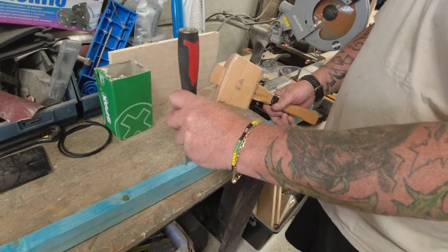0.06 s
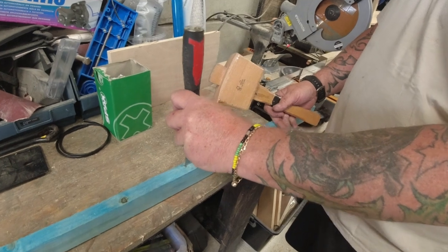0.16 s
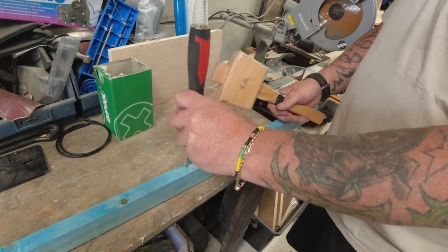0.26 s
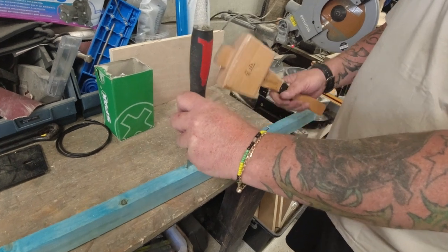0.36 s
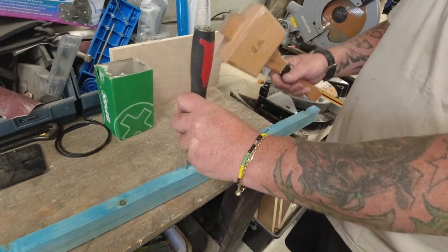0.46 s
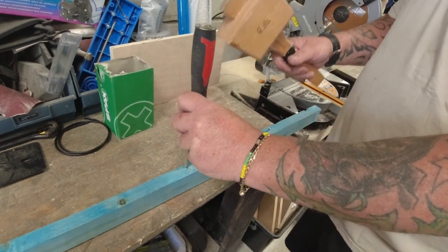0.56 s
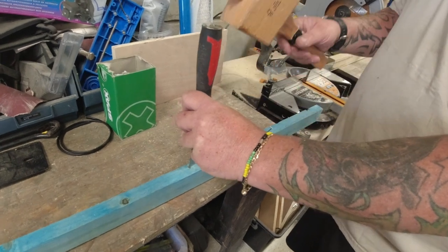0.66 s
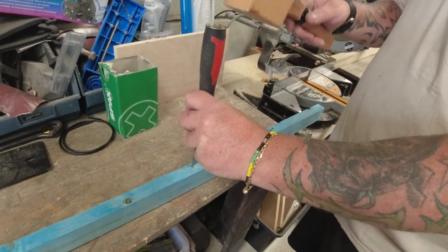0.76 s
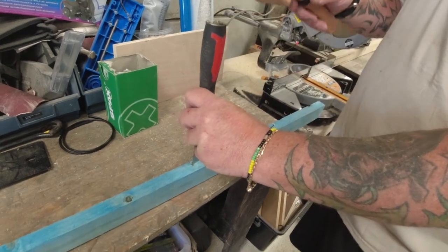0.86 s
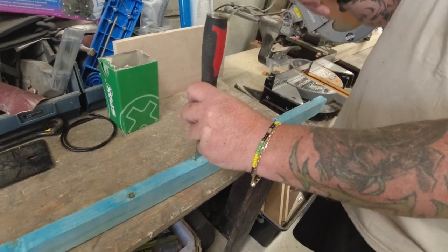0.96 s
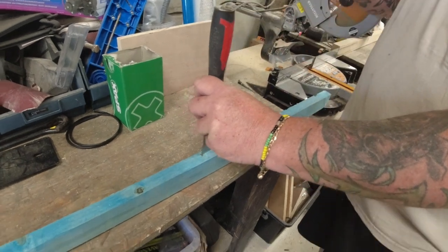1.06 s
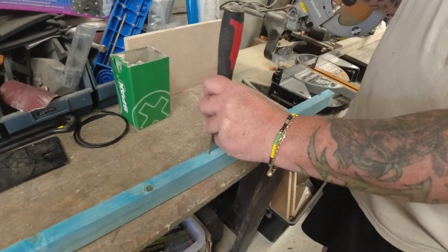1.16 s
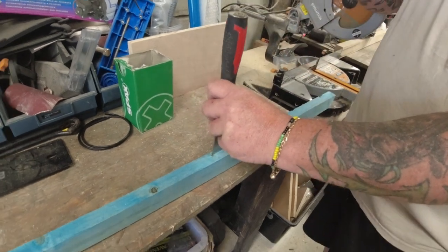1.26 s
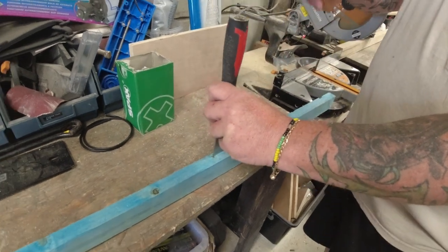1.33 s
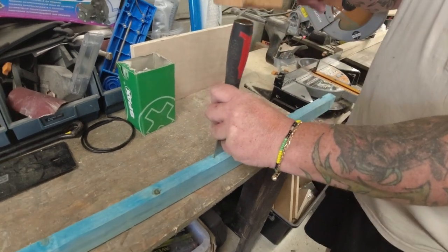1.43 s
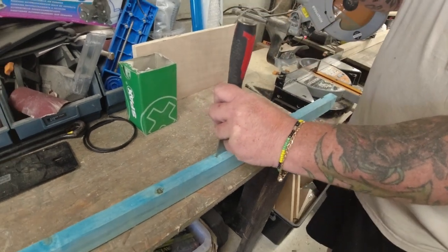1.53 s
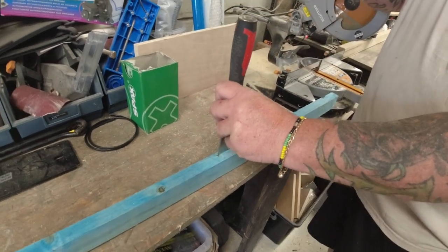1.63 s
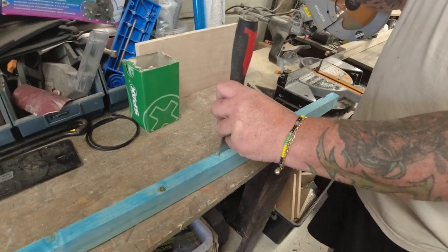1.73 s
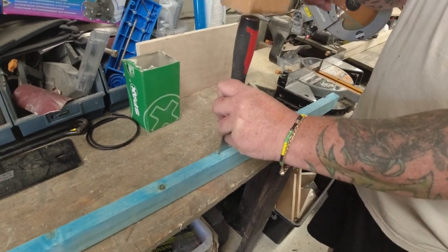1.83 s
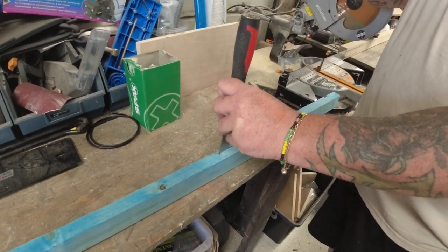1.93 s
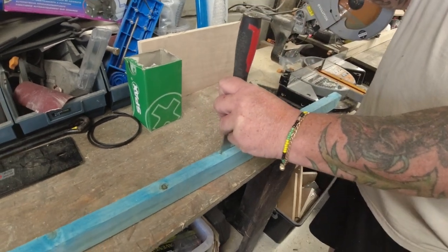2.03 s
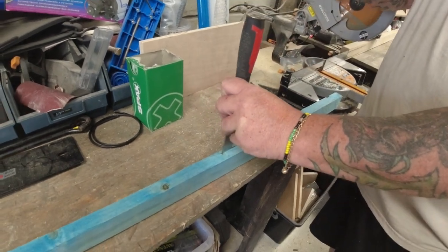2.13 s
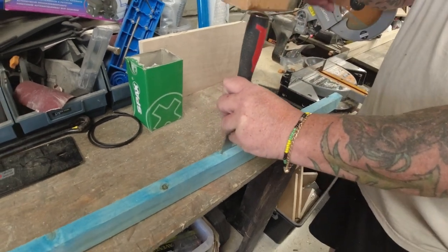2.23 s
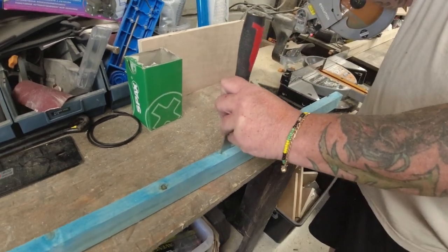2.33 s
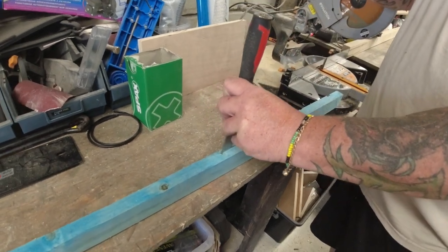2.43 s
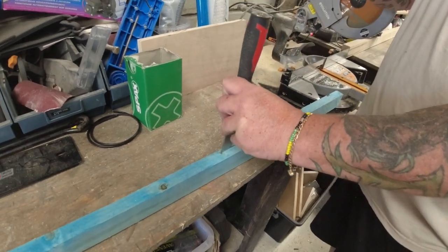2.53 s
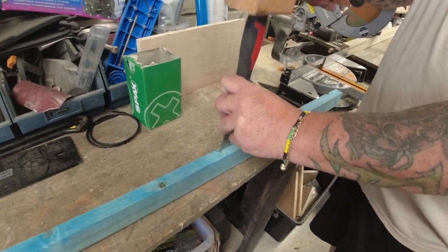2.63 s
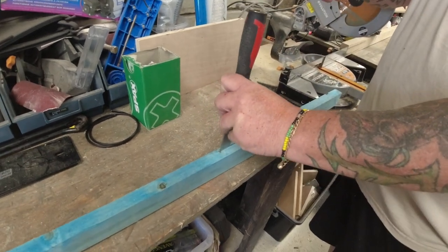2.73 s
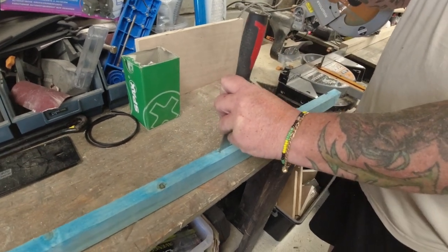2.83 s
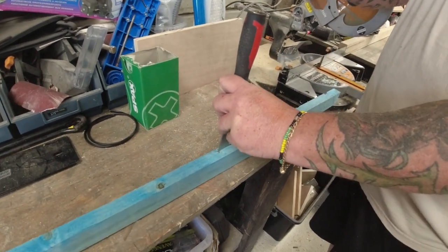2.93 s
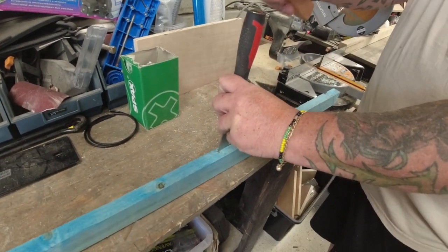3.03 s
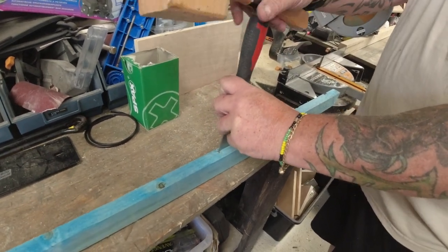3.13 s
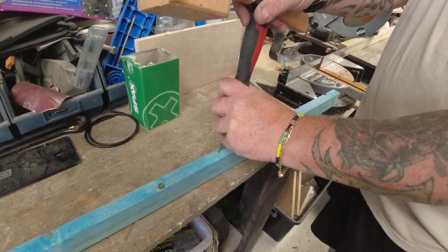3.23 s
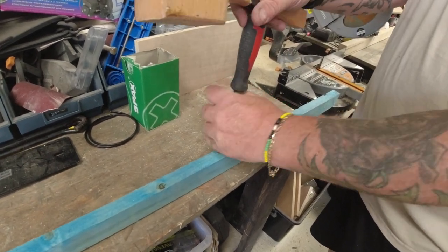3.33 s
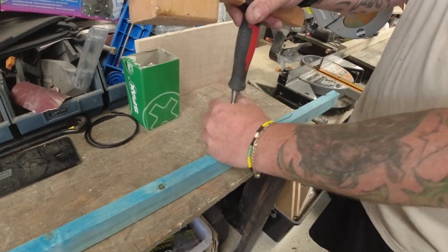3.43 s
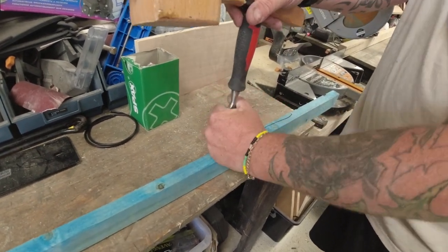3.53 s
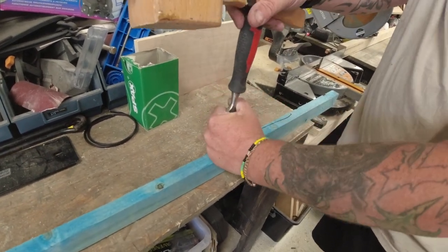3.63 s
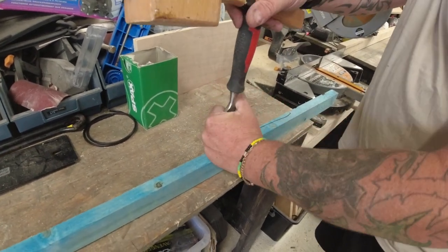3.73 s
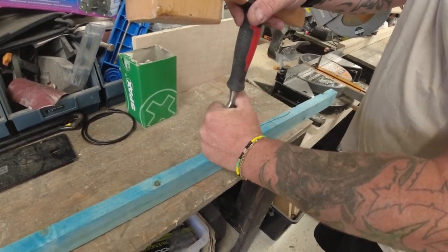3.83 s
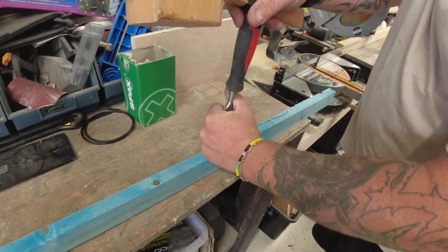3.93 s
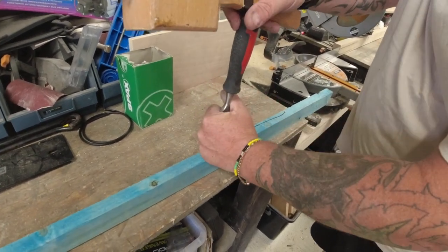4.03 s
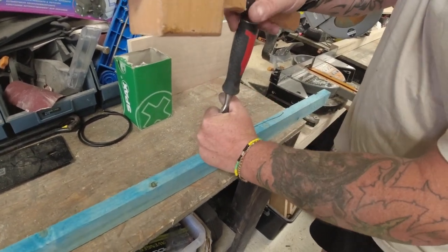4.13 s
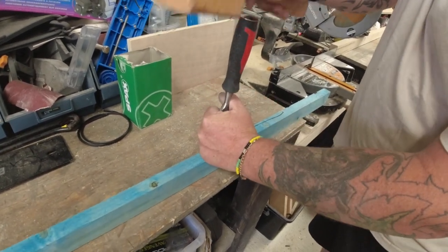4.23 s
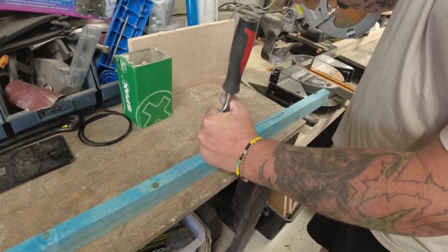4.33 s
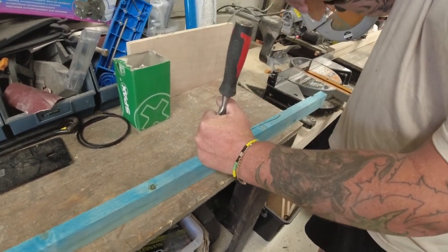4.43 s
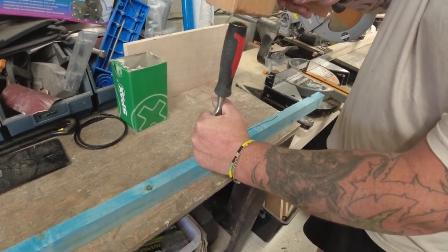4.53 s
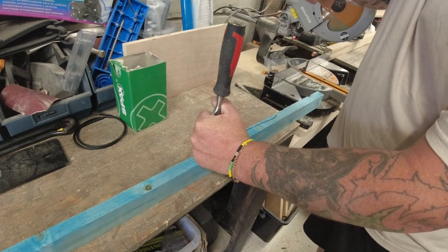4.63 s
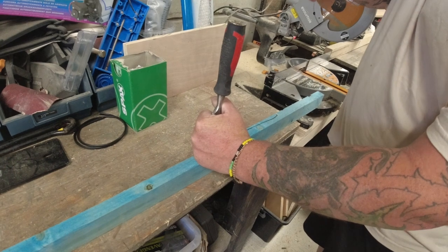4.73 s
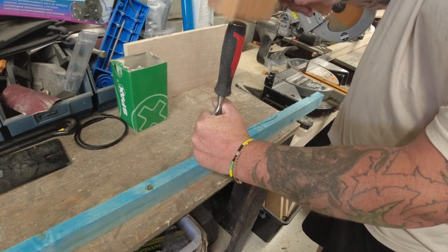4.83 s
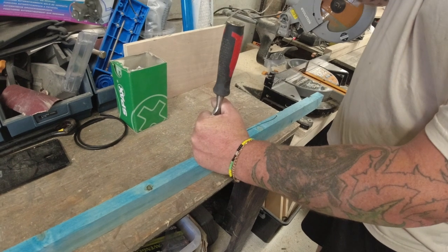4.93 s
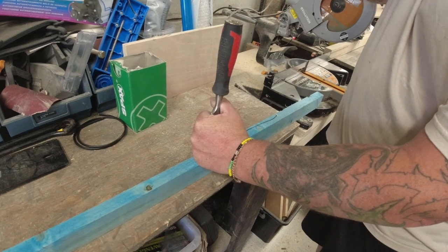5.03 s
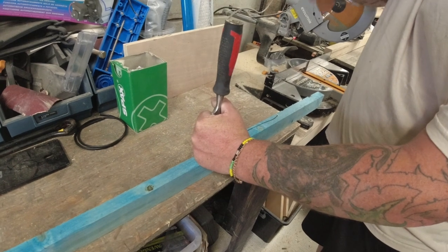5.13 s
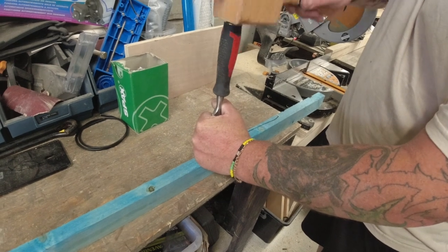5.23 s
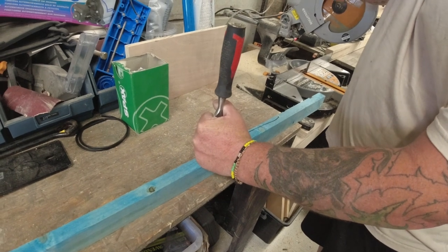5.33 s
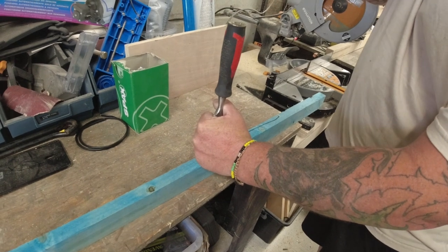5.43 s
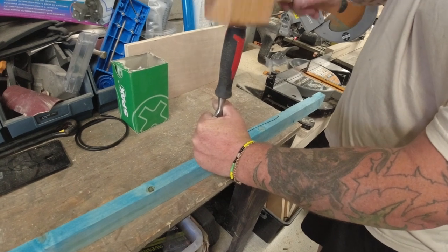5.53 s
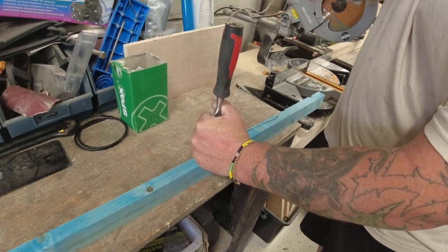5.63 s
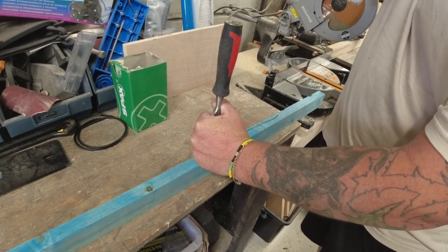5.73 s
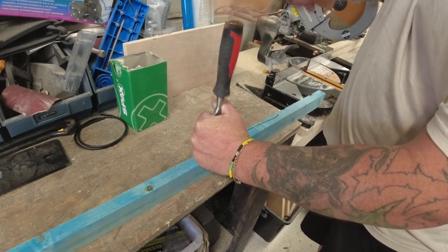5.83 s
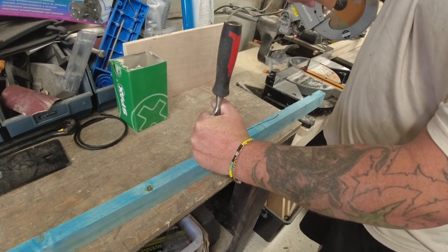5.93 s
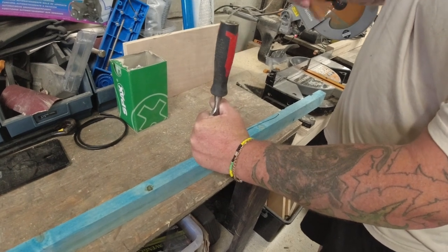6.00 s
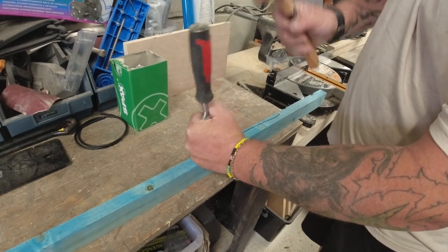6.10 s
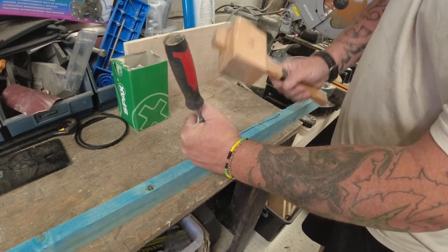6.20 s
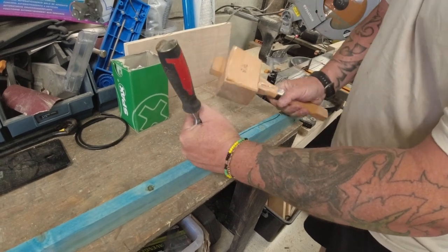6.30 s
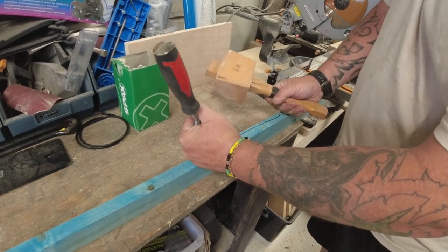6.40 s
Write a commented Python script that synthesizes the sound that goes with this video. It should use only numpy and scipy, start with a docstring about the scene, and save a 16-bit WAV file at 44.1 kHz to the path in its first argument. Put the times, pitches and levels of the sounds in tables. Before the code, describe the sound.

A mallet knocks a chisel into loose, clattering wood four times, pauses, then strikes four firmer, thumping blows over a steady workshop machine hum.

```python
"""A workshop machine hums, rushes and whirs throughout: sine tones, most of them wavering, and coloured noise.
From 1.5 s a mallet drives a chisel into a loose batten: four blows of shaped noise that clack and rebound.
At 3.3 s the edge ticks free and the batten settles; at 3.9 s the blade sings faintly, a resonant noise.
From 5.0 s four blows land where it sits more firmly and damped sines thump; only the last adds quick clacks.
A decaying noise tail answers every blow as the small workshop."""
import sys
import numpy as np
from scipy import signal
from scipy.fft import rfft, irfft, next_fast_len
from scipy.io import wavfile
from scipy.ndimage import uniform_filter1d, map_coordinates

SR = 44100
rng = np.random.default_rng(int(sys.argv[2]) if len(sys.argv) > 2 else 0)


def wav_out(sig):
    """Save sig, one row per channel (or a flat mono array), as 16-bit PCM at SR to the path in sys.argv[1]."""
    wavfile.write(sys.argv[1], SR, np.round(np.clip(np.atleast_2d(sig).T, -1, 1) * 32767).astype(np.int16))


N = 284886
TIME = np.arange(N) / SR  # the whole scene, s
HIT = np.arange(SR // 2) / SR  # one hit, s

# Mallet blows: start_s, knock_db, brightness_db_per_octave, tock_pitch_hz,
# tock_level_db (relative to knock_db), first_hop_s (of the batten; 0 = no slap and no hops)
BLOWS = [(1.5280, -15, 0, 3175, -11.5, 0.0065), (1.9472, -11, 1.5, 1990, -10, 0.06),
         (2.3323, -8.5, 0, 867.7, -11, 0.059), (2.7695, -9, -0.5, 907, -8, .0675),
         (4.995, -21, -2, 896, -4, 0), (5.3260, -9.5, -0.5, 2115, -7.5, 0),
         (5.6826, -11, 0.26, 2226, -7.5, 0), (5.989, -9.5, -0.1, 2059, -8, 0.00055)]
# Ring of the wood: pitch_hz, t60_s
WOOD_DECAY = [(200, 0.22), (500, 0.082), (1000, 0.094), (2000, 0.066), (4000, 0.058), (10000, 0.14)]
# Broad colour of the loose batten: pitch_hz, level_db (per Hz)
LOOSE_COLOUR = [(40, -45), (110, -16), (280, -8.5), (400, -6), (560, -3), (850, -5.5), (1200, -4),
                (2000, -8.5), (3000, -15.5), (4400, -23.5), (7000, -32.5), (15000, -55.5)]
# Resonances of the loose batten: pitch_hz, width_hz, level_db (relative to colour, before modes_db)
LOOSE_MODES = [(406.5, 17.4, 7.5), (442, 22, 3), (548, 27, -1), (628, 40, -2), (780, 55, 6.5), (857, 56, 0),
               (855, 13, -9), (1078, 16, 3), (1330, 45, -14), (1504, 49, -3), (1624, 67, -5.5),
               (1803, 18, -3), (2002, 45, 5.5), (2246, 86, -1.5), (3030, 82, -1.5)]
# Broad colour of the batten at the firmer spot: pitch_hz, level_db (per Hz)
FIRM_COLOUR = [(30, -30), (100, -10), (200, -2), (330, -2), (500, -2), (850, -1), (1150, -5), (1700, -4.5),
               (2200, -7.5), (2600, -8.5), (3600, -16), (4700, -28.5), (8000, -30), (15000, -49)]
# Resonances at the firmer spot: pitch_hz, width_hz, level_db (relative to colour, before modes_db)
FIRM_MODES = [(340.7, 13, 7), (435, 7.6, -11), (554, 17, -7), (600, 64, -10), (714, 63, -15), (820, 87, -9),
              (900, 39, -7), (1025, 30, -2.5), (1253, 44, -1), (1410, 32, 1), (1650, 63, 1),
              (1913, 22, 0.5), (2250, 208, 0.5), (3810, 150, 1)]
# Resonances of the bench top: pitch_hz, level_db (before scatter), t60_s
BENCH = [(75, -16, 0.21), (107.4, -5.5, 0.12), (137.5, 0, 0.1), (181, -1, 0.09), (242, -8, 0.071),
         (331, -11.5, 0.064)]
MOVE_S = 4.0  # blows before this land on the loose spot, later ones on the firmer spot
LOOSE_SWELL_S, FIRM_SWELL_S = 0.006, 0.0045  # for a 0 dB knock; lighter ones swell faster
LOOSE_CRACK_DB, FIRM_CRACK_DB = -14.5, -12.5  # steel, relative to knock_db
LOOSE_THUMP_DB, FIRM_THUMP_DB = -24.5, -3  # bench, relative to knock_db
BITE_DB, BITE_SLOPE = -15, 1.7  # below this knock_db the edge barely cuts: crack dB lost per dB


def chopping():
    """Each blow cracks at the edge, swells into the batten's knock and then reaches the bench top."""
    out = np.zeros((2, N))
    grain = dying(WOOD_DECAY)  # the same timber rings much alike every time
    for start_s, knock_db, tilt_db, tock_hz, tock_db, hop_s in BLOWS:
        loose = start_s < MOVE_S
        swell_s = (LOOSE_SWELL_S if loose else FIRM_SWELL_S) * amp(knock_db)
        shiver = (grain + 0.73 * dying(WOOD_DECAY)) * (1 - np.exp(-(HIT / swell_s) ** 2))
        if loose:
            wood = amp(0.57) * timber(shiver, LOOSE_COLOUR, LOOSE_MODES, modes_db=-0.5,
                                      tilt_db=tilt_db, travel_s=0.001993)
            steel = amp(LOOSE_CRACK_DB) * chisel(crack_t60=0.037, ring_db=-5.5, ring_t60=0.044, click_db=1.5)
            thump_db = LOOSE_THUMP_DB
        else:
            wood = amp(1.27) * timber(shiver, FIRM_COLOUR, FIRM_MODES, modes_db=-3,
                                      tilt_db=tilt_db, travel_s=0.001801)
            steel = amp(FIRM_CRACK_DB) * chisel(crack_t60=0.17, ring_db=-2.0, ring_t60=0.14, click_db=11)
            thump_db = FIRM_THUMP_DB
        bite_db = BITE_SLOPE * min(knock_db - BITE_DB, 0)
        blow = wood + amp(bite_db) * soften(steel, knock_db) + amp(tock_db) * tock(tock_hz, t60=0.018)
        thump = unit_hit(ring(BENCH, scatter_db=2.5))[None]
        add(out, start_s, amp(knock_db - 3) * in_room(blow, wet_db=-6.5, build_s=0.0032))
        add(out, start_s + 0.004998, amp(knock_db + thump_db) * in_room(thump, wet_db=-23.5, build_s=0.029))
        if hop_s > 0:
            for delay_s, level_db, clack_tilt_db in rebounds(hop_s, count=2):
                add(out, start_s + delay_s, amp(knock_db + level_db) * clack(clack_tilt_db))
    return out


# Likeness of left and right in the wood: pitch_hz, correlation (no unit)
WOOD_ALIKE = [(200, 1), (500, 0.99), (1000, 0.84), (2000, 0.56), (4000, 0.096), (12000, .1)]


def timber(shiver, colour, modes, modes_db, tilt_db, travel_s):
    """The batten's knock; bending waves take travel_s at 1 kHz and longer in the bass."""
    def response(hz):
        body = amp(along(colour, hz)) * (1 + amp(modes_db) * resonances(modes, hz))
        lag_s = travel_s * np.maximum(2.5 * np.sqrt(1000 / np.maximum(hz, 250)) - 1.5, 0)
        slope = amp(tilt_db * np.log2(np.clip(hz, 250, 5000) / 1000))
        # summing the lag over frequency gives the phase that delays each band
        return body * slope * np.exp(-2j * np.pi * np.cumsum(lag_s) * hz[1])
    return unit_hit(filtered(stereo(even(shiver, size=160), WOOD_ALIKE), response))


# Colour of the edge's crack: pitch_hz, level_db (per Hz)
CRACK = [(1500, -22), (3200, 6.5), (5500, -0.5), (8000, -3.5), (9800, -9), (12000, -9.5), (16000, -12.5)]
# Broad resonances of the chisel blade: pitch_hz, width_hz, level_db
STEEL = [(5570, 390, -3), (6740, 400, -13.5), (9910, 500, -11.5), (9400, 500, -11), (9400, 500, -7.5)]


def chisel(crack_t60, ring_db, ring_t60, click_db):
    """A sharp first contact; the edge snaps through fibres in uneven bursts and shakes the damped blade."""
    bursts = amp(3.0 * map_coordinates(rng.standard_normal(500), [HIT * 900]))
    click = amp(click_db - 60 * HIT / 0.0045)
    force = bursts * amp(-60 * HIT / crack_t60) + click
    snapping = rng.standard_normal((2, len(HIT))) * force
    crack = unit_hit(filtered(snapping, lambda hz: amp(along(CRACK, hz))))
    shake = rng.standard_normal((2, len(HIT))) * amp(-60 * HIT / ring_t60)
    return crack + amp(ring_db) * unit_hit(filtered(shake, lambda hz: resonances(STEEL, hz)))


def soften(crack, knock_db):
    """A lighter blow stays in contact longer, so its crack lacks the top."""
    return dulled(crack, 44000 * amp(0.6 * knock_db))


def tock(hz, t60):
    """Mallet head and handle ring for a few cycles, at a pitch set by how squarely they meet."""
    envelope = amp(-60 * HIT / t60) * (1 - np.exp(-HIT / 0.0013))
    return unit_hit(np.sin(2 * np.pi * hz * HIT) * envelope)


def ring(modes, scatter_db):
    """Damped sines of alternating sign, at new strengths for every blow."""
    total = np.zeros(len(HIT))
    for k, (hz, level_db, t60) in enumerate(modes):
        envelope = amp(level_db + scatter_db * rng.normal() - 60 * HIT / t60)
        total += (-1) ** k * envelope * np.sin(2 * np.pi * hz * HIT)
    return total


# The batten slaps the bench, then hops; levels are relative to knock_db, tilts are dB per octave
SLAP_S, SLAP_DB, SLAP_TILT_DB = 0.0165, -6.5, 0.5
LANDING_DB, LANDING_TILT_DB = -13.5, -5.5  # first landing after a usual hop
USUAL_HOP_S, HOP_DB_PER_S = 0.06, 300  # a longer hop lands harder
HOP_SHRINK = 0.74  # each hop's length over the one before
HOP_LOSS_DB, HOP_DULL_DB = 5, 1.5  # each landing under the one before: dB, dB per octave


def rebounds(hop_s, count):
    """The slap and ever weaker, duller landings, as (delay_s, level_db, tilt in dB per octave)."""
    landings_s = SLAP_S + np.cumsum(hop_s * HOP_SHRINK ** np.arange(count))
    first_db = LANDING_DB + HOP_DB_PER_S * (hop_s - USUAL_HOP_S)
    hits = [(SLAP_S, SLAP_DB, SLAP_TILT_DB)]
    for k, delay_s in enumerate(landings_s):
        hits.append((delay_s, first_db - HOP_LOSS_DB * k, LANDING_TILT_DB - HOP_DULL_DB * k))
    return hits


def clack(tilt_db):
    """The batten meets the bench and rings with its loose body."""
    wood = timber(dying(WOOD_DECAY), LOOSE_COLOUR, LOOSE_MODES, modes_db=-2,
                  tilt_db=tilt_db, travel_s=0.001031)
    return in_room(wood, wet_db=-9.5, build_s=0.012)


NUDGE_S = 3.260
NUDGE_DB, NUDGE_TICK_DB = -30.5, -48  # the batten's knock, the edge's tick


def nudge():
    """The chisel is pulled free: its edge ticks and the batten settles with a soft knock."""
    out = np.zeros((2, N))
    tick = dulled(chisel(crack_t60=0.012, ring_db=-15, ring_t60=0.03, click_db=6), edge_hz=4400)
    shiver = dying(WOOD_DECAY) * (1 - np.exp(-(HIT / 0.0043) ** 2))
    wood = timber(shiver, LOOSE_COLOUR, LOOSE_MODES, modes_db=1, tilt_db=-5.5, travel_s=0.00299)
    add(out, NUDGE_S, amp(NUDGE_TICK_DB) * in_room(tick, wet_db=-4, build_s=0.01))
    add(out, NUDGE_S + 0.0068, amp(NUDGE_DB) * in_room(wood, wet_db=-8, build_s=0.015))
    return out


def blade_tink():
    """The blade's top resonance sings faintly as it is set on the new spot."""
    out = np.zeros((2, N))
    envelope = amp(-60 * HIT / 0.7) * (1 - np.exp(-HIT / 0.008))
    scrape = rng.standard_normal((2, len(HIT))) * envelope
    # squaring the resonance narrows it
    tink = unit_hit(filtered(scrape, lambda hz: resonances([(9350, 690, 0)], hz) ** 2))
    add(out, 3.895, amp(-61.0) * tink)
    return out


# Fading of the workshop's answer: pitch_hz, t60_s
ROOM_DECAY = [(100, 0.27), (400, 0.44), (1000, 0.72), (2200, 0.45), (5000, 0.52), (10000, 0.45),
              (15000, 0.12)]
# Colour of the workshop's answer: pitch_hz, level_db
ROOM_COLOUR = [(100, 12.5), (400, 0), (1000, -1.5), (2200, 1), (5000, -1), (10000, -7), (15000, -11.5)]
# Likeness of left and right in the workshop: pitch_hz, correlation (no unit)
ROOM_ALIKE = [(150, 0.96), (500, 0.97), (1000, 0.93), (2000, 0.61), (4000, 0.068), (12000, 0.15)]


def in_room(sound, wet_db, build_s):
    """A sound with the workshop's answer, which builds up as the walls join in."""
    tail = even(dying(ROOM_DECAY) * (1 - np.exp(-(HIT / build_s) ** 2)), size=160)
    tail = stereo(filtered(tail, lambda hz: amp(along(ROOM_COLOUR, hz))), ROOM_ALIKE)
    answer = signal.fftconvolve(sound[:1], tail, axes=1)[:, :len(HIT)]
    return sound + amp(wet_db) * answer


# Level of the drone, which hum, air and low rush follow: start_s, level_db (relative to usual)
DRONE = [(0, 0.5), (.55, 0), (.75, 2.5), (1.4, 2.8), (2.1, -0.8), (3.2, -5), (5.3, -0.8), (6.46, -4)]
# Level of the deep rumble: start_s, level_db
RUMBLE = [(0, -43), (.9, -38), (1.8, -43), (2.7, -50.5), (5.2, -42), (6.46, -46.5)]
# Level of the whir: start_s, level_db
WHIRRING = [(0, -49), (.8, -51), (1.1, -47), (1.7, -51.5), (3.4, -48.5), (3.6, -55.5), (6.46, -51.5)]
# Continuous tones, most of them wavering: pitch_hz,
# level_db (relative; below 100 Hz they follow the rumble, above it the hum), waver (0-1)
TONES = [(35, -17.5, .15), (40, -11.5, .1), (70.4, -17.5, 0.01), (76.6, -16.5, 0.5), (86, -24, 0.6),
         (144, -27.5, 1), (153.5, -17.5, 0), (180.2, -12.5, 0.4), (278, -25, 0.2), (431, -23, 0.02)]
# Colour of the rushing air: pitch_hz, level_db (per Hz)
AIR = [(20, -14.5), (120, -4), (160, 11), (240, 0.5), (450, -4), (500, -9.5), (600, -5), (1100, -9.5),
       (1200, -13.5), (2100, -16.5), (3300, -20), (4800, -27), (5600, -34), (13000, -46), (15000, -65.5)]
# Resonances in the rushing air: pitch_hz, width_hz, level_db (relative to AIR)
AIR_MODES = [(333, 10, -7), (540, 37, 0.5), (622, 7.8, 4.5), (761, 18, -1), (983, 12, -1), (1024, 14, -3),
             (1076.6, 17, 7.5), (1390, 50, -2.5), (1596, 32, 2.5), (2347, 18, 12.5), (5000, 50, -7)]
# Colour of the low rush: pitch_hz, level_db (per Hz)
LOW_RUSH = [(200, -29.5), (260, -1.5), (330, 0), (450, -0.5), (500, -13), (630, -6), (800, -17),
            (1200, -29), (3000, -68)]
# Colour of the narrow whir: pitch_hz, level_db (per Hz)
WHIR = [(2000, -40), (2380, -15.5), (2490, -2), (2550, -4.5), (2605, 6.5), (2660, -7.5), (2770, -3),
        (2870, -12), (2960, -28), (4000, -57)]
HUM_HZ = 200.2
HUM_DB, AIR_DB, LOW_RUSH_DB = -31, -41.5, -51.5  # usual levels
HUM_FOLLOWS, AIR_FOLLOWS, LOW_RUSH_FOLLOWS = 0.67, 0.63, 3.1  # dB gained per dB of drone


def machine():
    """A mains hum, shaft tones, air rushing through resonances, a low rush and a narrow whir."""
    drone_db, rumble_db, whir_db = curve(DRONE), curve(RUMBLE), curve(WHIRRING)
    hum_db = HUM_DB + HUM_FOLLOWS * drone_db
    air_db = AIR_DB + AIR_FOLLOWS * drone_db
    low_rush_db = LOW_RUSH_DB + LOW_RUSH_FOLLOWS * drone_db
    hum = amp(hum_db) * tone(HUM_HZ, waver=0.11)
    shafts = np.zeros(N)
    for hz, level_db, waver in TONES:
        followed_db = rumble_db + 9.5 if hz < 100 else hum_db - 1.3
        shafts += amp(level_db + followed_db) * tone(hz, waver)
    air = noise(lambda hz: amp(along(AIR, hz)) * (1 + resonances(AIR_MODES, hz)))
    low_rush = noise(lambda hz: amp(along(LOW_RUSH, hz)))
    whir = noise(lambda hz: amp(along(WHIR, hz)))
    # each noise flutters by its own random number of dB
    air = amp(air_db + 0.42 * wobble(5.8)) * air
    low_rush = amp(low_rush_db + 2.0 * wobble(23)) * low_rush
    whir = amp(whir_db + 1.8 * wobble(21)) * whir
    return hum + shafts + air + low_rush + whir


def tone(hz, waver):
    """A sine whose strength and phase drift at random, as far as waver lets them."""
    drift = 1 + waver * (wobble(6.2) + 1j * wobble(6.5))
    return unit(np.real(drift * np.exp(2j * np.pi * (hz * TIME + rng.random()))))


def noise(colour):
    """Coloured noise, with the left-right likeness of the workshop."""
    return unit(stereo(filtered(rng.standard_normal((2, N)), colour), ROOM_ALIKE))


def amp(db):
    """Decibels to gain."""
    return 10 ** (np.asarray(db) / 20)


def unit(x):
    """Scale to rms 1."""
    return x / np.sqrt(np.mean(x ** 2) + 1e-20)


def unit_hit(x):
    """Scale a hit to the energy of 20 ms at rms 1."""
    return unit(x) * np.sqrt(SR / 50 / x.shape[-1])


def along(points, hz):
    """Read (pitch_hz, value) points on a log axis."""
    f, v = np.transpose(points)
    return np.interp(np.log(hz + 1), np.log(f + 1), v)


def curve(rows):
    """Read (start_s, level_db) points as one level per sample."""
    start_s, level_db = np.transpose(rows)
    return np.interp(TIME, start_s, level_db)


def wobble(rate):
    """A smooth random curve, rate knots a second."""
    return map_coordinates(rng.standard_normal(int(N * rate / SR) + 4), [TIME * rate])


def filtered(x, response):
    """Filter x with a complex response of frequency."""
    size = x.shape[-1]
    m = next_fast_len(size + SR // 4)  # room for the filter's tail
    return irfft(rfft(x, m) * response(np.fft.rfftfreq(m, 1 / SR)), m)[..., :size]


def resonances(modes, hz):
    """Complex response of (pitch_hz, width_hz, level_db) resonances."""
    return sum(amp(db) * 1j * hz * w / (c * c - hz * hz + 1j * hz * w) for c, w, db in modes)


def dulled(x, edge_hz):
    """A steep low-pass."""
    return signal.sosfilt(signal.butter(6, min(edge_hz, 0.47 * SR), fs=SR, output="sos"), x)


def dying(decay):
    """Two dense rings in which each frequency dies at its own speed."""
    hz, t, z = signal.stft(rng.standard_normal((2, len(HIT))), SR, nperseg=128)
    fading = z * amp(-60 * t / along(decay, hz)[:, None])
    return signal.istft(fading, SR, nperseg=128)[1][:, :len(HIT)]


def even(x, size):
    """Level the spectrum by its power averaged over size bins around each bin."""
    z = rfft(x, 2 * len(HIT))
    power = np.abs(uniform_filter1d(np.abs(z) ** 2, size))
    return irfft(z / np.sqrt(power + 1e-12))[..., :len(HIT)]


def stereo(pair, alike):
    """Two unrelated signals become left and right with a given correlation."""
    def mid_side(hz):
        turn = np.arccos(np.clip(along(alike, hz), -1, 1)) / 2
        return np.array([np.cos(turn), np.sin(turn)])
    mid, side = filtered(pair, mid_side)
    return np.array([mid + side, mid - side])


def add(track, start_s, sound):
    """Mix a sound into the track at start_s."""
    part = track[:, round(start_s * SR):][:, :sound.shape[-1]]
    part += sound[..., :part.shape[-1]]


def scene():
    """Bench work over the running machine."""
    return chopping() + nudge() + blade_tink() + machine()


TOP_HZ = 15900  # band limit


def record(dry):
    """The recorder rounds off the highest peaks and steeply cuts what lies above its band limit."""
    rounded = dry / (1 + np.abs(dry / 0.85) ** 4) ** (1 / 4)
    return signal.sosfilt(signal.butter(16, TOP_HZ, fs=SR, output="sos"), rounded)


dry = scene()
out = record(dry)
wav_out(out)
```